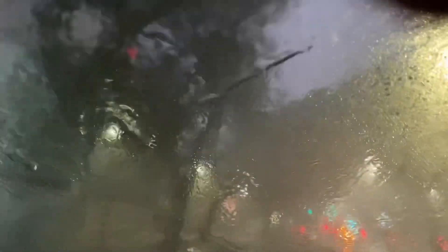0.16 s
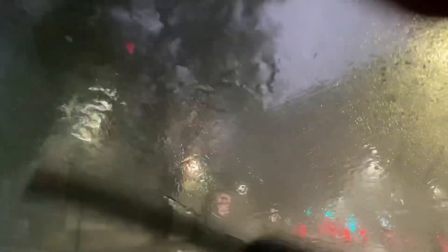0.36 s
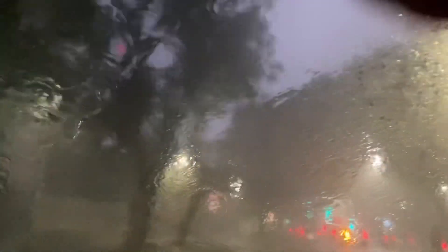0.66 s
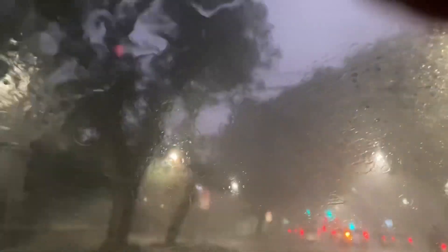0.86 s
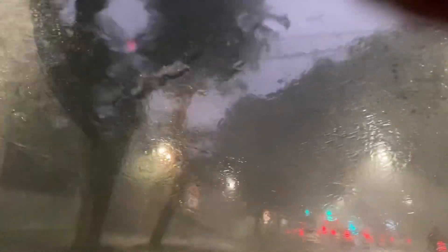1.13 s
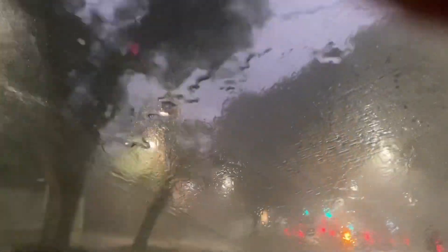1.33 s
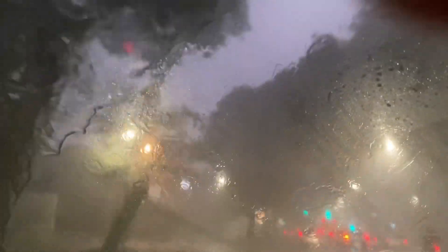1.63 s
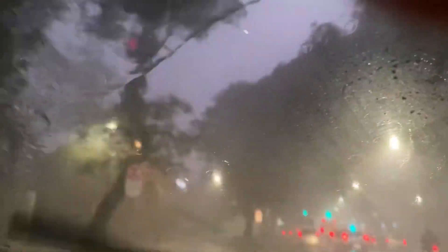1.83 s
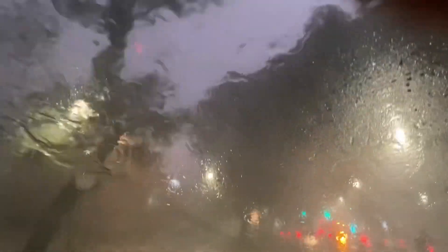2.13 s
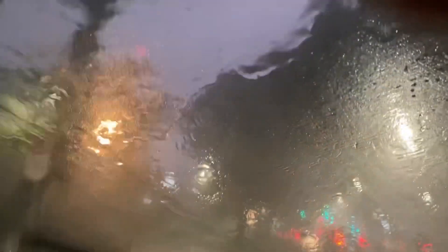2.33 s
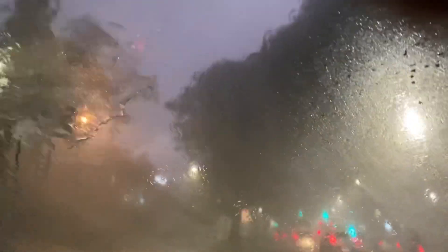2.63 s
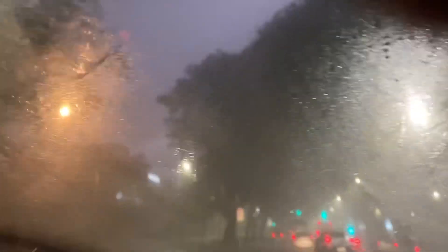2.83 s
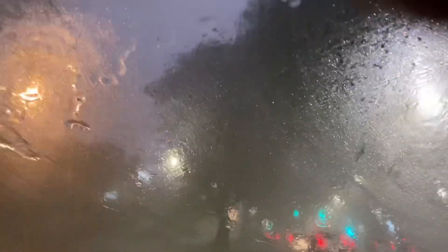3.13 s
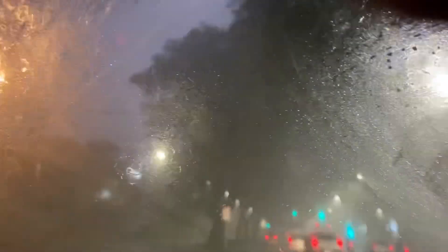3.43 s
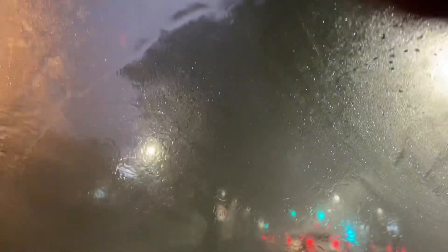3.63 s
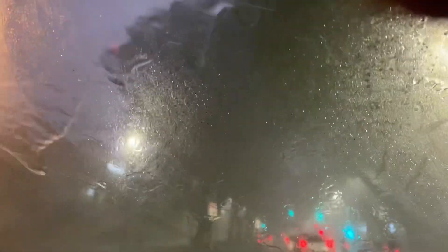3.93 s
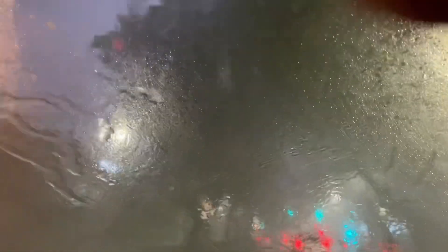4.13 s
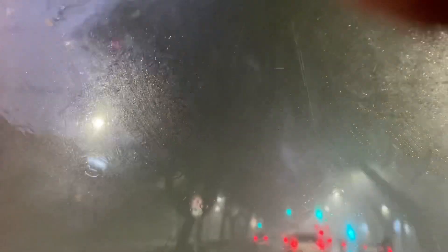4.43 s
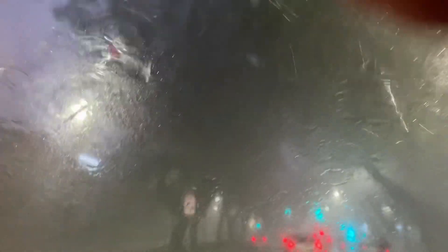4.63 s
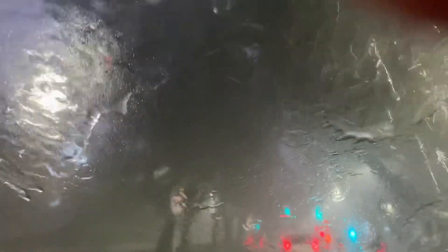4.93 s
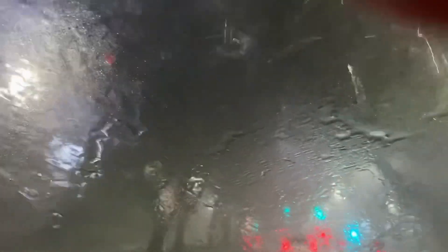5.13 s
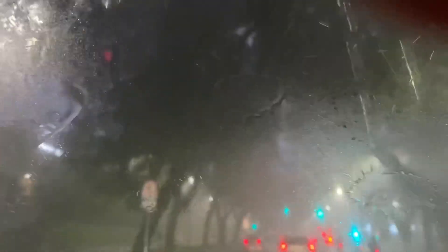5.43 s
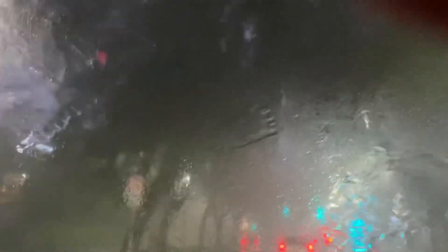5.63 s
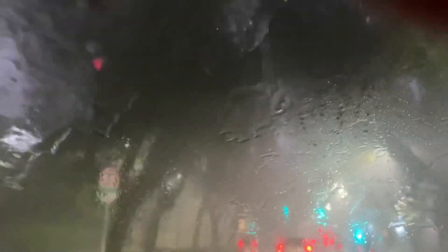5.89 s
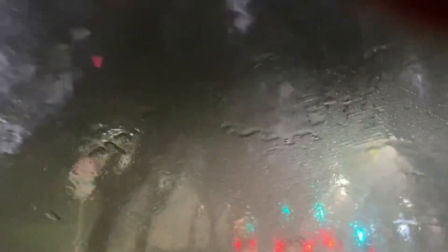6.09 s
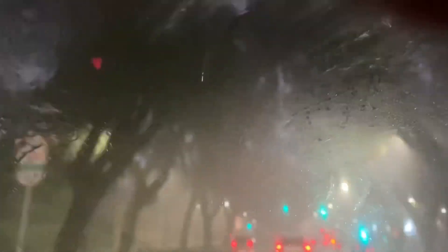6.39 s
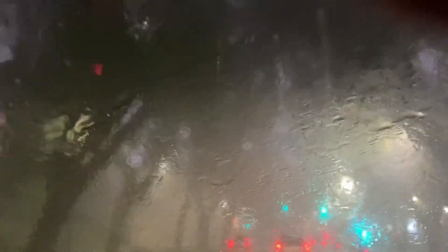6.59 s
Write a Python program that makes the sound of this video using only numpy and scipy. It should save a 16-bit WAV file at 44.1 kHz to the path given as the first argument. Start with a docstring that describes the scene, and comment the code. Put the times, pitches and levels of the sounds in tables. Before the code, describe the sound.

Heavy rain drumming on a car's glass, sharp splats and ticks, regular wiper knocks, and a deep engine hum stepping down over road rumble.

```python
"""Rain drums on the windscreen and roof of a slowing car: hiss and patter are shaped noise, big splats
are noise bursts, and drops on the glass are short ticks. The engine, a stack of multiples of its firing
rate, drones through its gears over a road rumble of lumpy filtered noise. The wipers thud at both ends
of their sweep and heavy drips thud too: decaying cowl modes, with rubber ticks, slaps and low pushes.
In rain, glass and road, left and right share the bass and the top treble and differ most between."""
import sys
import numpy as np
from scipy import signal
from scipy.fft import rfft, irfft, next_fast_len
from scipy.io import wavfile
from scipy.ndimage import uniform_filter1d, map_coordinates

SR = 44100
rng = np.random.default_rng(int(sys.argv[2]) if len(sys.argv) > 2 else 0)


def transcribe(u):
    """Save the signal u as a 16-bit wav file named by the first command-line argument.

    u: samples, shape (n,) or (channels, n), limited to [-1, 1]; the rate is SR.
    q: integer samples, one column per channel.
    """
    v = np.clip(np.atleast_2d(u).T, -1, 1)
    q = np.round(v * 32767).astype(np.int16)
    wavfile.write(sys.argv[1], SR, q)


N = 297802


def amp(db):
    """Decibels to gain."""
    return 10 ** (np.asarray(db) / 20)


def unit(x):
    """Scale to an RMS of 1."""
    return x / np.sqrt(np.mean(x ** 2) + 1e-20)


def along(points, hz):
    """Read (Hz, value) points along a log frequency axis."""
    point_hz, value = np.transpose(points)
    return np.interp(np.log(hz + 1), np.log(point_hz + 1), value)


def curves(rows):
    """One value per sample for each column after the time."""
    s, *columns = np.transpose(rows)
    return [np.interp(np.arange(N) / SR, s, column) for column in columns]


def wobble(rate):
    """A smooth random curve with rate knots a second."""
    knots = rng.standard_normal(int(N * rate / SR) + 4)
    return map_coordinates(knots, [np.arange(N) * rate / SR])


def filtered(x, response):
    """Multiply the spectrum of x by a complex response of frequency."""
    size = next_fast_len(N + 8192)
    return irfft(rfft(x, size) * response(np.fft.rfftfreq(size, 1 / SR)), size)[..., :N]


# Likeness of left and right: pitch_hz, likeness (0 to 1)
LIKENESS = [(30, 1), (70, 1), (160, 0.83), (270, 0.76), (500, 0.17), (800, 0.41), (1100, 0.022),
            (1600, 0.04), (3000, 0.49), (5600, 0.23), (6500, 0.31), (7600, 0.48), (8400, 1), (15500, 1)]
# Phase of left ahead of right: pitch_hz, phase_rad
STEREO_PHASE = [(100, 0), (400, -.3), (900, 1), (1200, -1.5), (1800, -1.4), (2100, .4), (3000, .8),
                (6000, .6), (8400, -np.pi), (9900, -2 * np.pi), (12200, -3 * np.pi), (14000, -4 * np.pi),
                (15600, -5 * np.pi)]
# Balance, left minus right: pitch_hz, balance_db
BALANCE = [(45, 0), (70, -0.7), (120, -1.4), (220, 1), (450, 1.4), (800, 1), (1290, 0.6), (2380, 3),
           (4400, 2.8), (8120, 0.3), (15000, 0)]


def stereo(pair):
    """Two unrelated sounds become left and right: partly shared, with phase and balance turning with pitch."""
    def right_mix(hz):
        alike = np.clip(along(LIKENESS, hz), 0, 1)
        shared = alike * np.exp(-1j * along(STEREO_PHASE, hz))
        own = np.sqrt(1 - alike ** 2)
        return amp(-along(BALANCE, hz) / 2) * np.array([shared, own])

    left = filtered(pair[0], lambda hz: amp(along(BALANCE, hz) / 2))
    right = filtered(pair, right_mix).sum(axis=0)
    return np.array([left, right])


PATCHY_DB = 1.5  # RMS depth of the blotches


def blotchy():
    """Two noises whose gain varies in small patches of time and pitch."""
    spectra = signal.stft(rng.standard_normal((2, N)), nperseg=1024)[2]
    patches = rng.standard_normal(spectra.shape[1:])
    for axis in (0, 1):
        patches = uniform_filter1d(patches, size=3, axis=axis)
    gain = amp(PATCHY_DB * unit(patches))
    return unit(signal.istft(spectra * gain, nperseg=1024)[1][:, :N])


def fading(power, t60):
    """Every spike of power dies away by 60 dB over t60 seconds."""
    return signal.lfilter([1], [1, -amp(-120 / (t60 * SR))], power)


def patter(per_second, spread_db, colour_db, t60):
    """Power of random drops in three colours, mean 1; a few drops are far bigger than the rest."""
    drops = rng.random((round(per_second * 7), 5))
    at = np.minimum(drops[:, 0] * N, N - 1).astype(int)
    size_db = -spread_db * np.log(np.maximum(drops[:, 1], .004))
    power = []
    for chance in drops[:, 2:].T:
        spikes = np.bincount(at, amp(2 * (size_db + colour_db * (2 * chance - 1))), N)
        power.append(fading(spikes, t60))
    power = np.array(power)
    return power / power.mean(axis=1, keepdims=True)


# Loudest single splats: start_s, level_db, tick_pitch_hz, dull_db, bright_db (both relative to level_db)
SPLATS = [(0.045, -21, 2950, 2, -8), (0.0643, -16.5, 3500, 2, -6), (0.096, -20.5, 3940, 0, 4.5),
          (0.1531, -19, 3600, -4, -6), (0.1805, -9, 2790, -7, -3), (0.2, -20, 2500, 4, -7),
          (0.2447, -16.5, 2960, 5.5, -8), (0.2843, -24, 3010, -10, 10), (0.3084, -21, 2200, 5, 1),
          (0.34, -16.5, 3160, 6.5, -9), (0.3802, -16, 3190, -9, -10), (0.415, -23, 4500, -3, 2),
          (0.4219, -16, 4300, -6, 1), (0.43, -19.5, 3500, 5, 0), (0.44, -17, 2000, 2, 0),
          (0.4534, -24, 3200, -4, 2), (0.4756, -21.5, 5500, -10, 7.5), (0.5164, -22.5, 2960, 3, 7.5),
          (0.591, -22.5, 2870, 6, 3), (0.6712, -13.5, 3110, -3, -5), (0.8034, -19, 2740, -1, -6),
          (0.9018, -19.5, 2994, -3, 6.5), (0.932, -15, 2600, -7, -5), (0.957, -23, 3300, -8, 2),
          (1.0002, -28, 3000, -8, 4), (1.009, -21, 2310, 5.5, 8.5), (1.0365, -18, 2410, -9, -7),
          (1.0503, -17, 2628, 1.5, -4), (1.1, -18, 2930, -4, 2), (1.2088, -20.5, 2216, 2, -20),
          (1.304, -28.5, 3370, 13.5, 2), (1.4473, -23.5, 3540, 8.5, -14), (1.5163, -22.5, 3250, 7, -15),
          (1.5777, -23.5, 2880, 6, -8), (1.683, -26, 3403, -8, 6), (1.7253, -31, 3120, 5, -6),
          (1.7519, -17, 3180, -2, -10), (1.7916, -22, 3397, -1, -3), (1.887, -20, 2260, 4, -10),
          (1.898, -19, 2610, 2.5, -5), (1.984, -20.5, 3500, -6, 1), (1.9941, -15, 3820, -5, 3.5),
          (2.04, -10.5, 2895, -1, -4), (2.1089, -18, 3030, -5, -13), (2.156, -20, 3040, 4, -3),
          (2.1882, -21.5, 2945, 5, 4), (2.2544, -18.5, 2966, 2, -9), (2.2955, -23, 2823, -5, 6),
          (2.4017, -20.5, 3180, -10, -15), (2.5233, -25, 2478, 7, -3), (2.505, -24.5, 2500, 7, -9),
          (2.5407, -23, 3000, -6, 2), (2.547, -15, 2512, 0, -1.5), (2.633, -19.5, 2270, 6, -7),
          (2.674, -21, 3137, 2, 3), (2.739, -17, 3790, -7, -4), (2.7786, -23.5, 2990, -8, -2),
          (2.811, -22, 3340, -3, -5), (2.833, -28, 3800, -8, -4), (3.2809, -26, 2493, -9, -5),
          (3.4305, -24, 3000, -3, 1), (3.5113, -25, 3000, -6, 1), (3.9024, -24, 2290, -4, 4),
          (4.175, -25, 2500, 4, 0), (4.2362, -32, 3000, -5, 0), (4.3724, -26.5, 2584, 7, -5),
          (4.8137, -26, 3010, -9, -15), (4.8784, -17.5, 2731, -4, -8), (4.8946, -11.5, 2397, -9, -7),
          (4.9768, -19.5, 2750, 2, 3.5), (4.937, -17.5, 1800, 0, 0), (5.0682, -24, 4500, -6, -4),
          (5.0976, -23, 2600, -4, -10), (5.14, -18.5, 2000, 4.5, -6), (5.1218, -18.5, 2280, 0, -1),
          (5.17, -20, 3400, -8, -3), (5.236, -19, 2450, 5.5, -3), (5.247, -19.5, 2202, -3, -3),
          (5.272, -24, 3413, 9, 5.5), (5.386, -20.5, 2433, 1, 3), (5.4263, -24, 2904, 6, -3),
          (5.471, -23, 2374, 0, -3), (5.5373, -20, 2238, 6, -5), (5.5949, -19, 2327, -1, -13),
          (5.6987, -16, 2200, -19, -25), (5.7367, -39, 2780, -7, -13), (5.803, -15.5, 3376, 1, -9),
          (5.874, -18, 2420, 7.5, 0), (5.923, -20, 2565, -6, -3), (6.0365, -23.5, 3097, 6.5, 0),
          (6.0608, -31.5, 2617, 15, 6), (6.1, -20, 2668, -2, 0), (6.4134, -23, 2686, -11, 0),
          (6.4725, -14.5, 2417, -4, -1), (6.594, -24, 3104, -2, 5), (6.6341, -19, 2270, 2.5, -2),
          (6.6622, -15.5, 3250, -9, -1), (6.6936, -18.5, 4274, -8, 3), (6.7065, -17, 2755, -12, -5),
          (6.726, -15.5, 3450, -13, -5)]
# Decay of a splat's dull, middle and bright splash: t60_s
SPLASH_S = [
    [0.045],
    [0.032],
    [0.024],
]
CRACK_DB, CRACK_S, CRACK_RISE_S = 8, 0.008, 0.0007  # crack over splash before its rise; t60; rise time


def splats():
    """Power of the big drops' crack and splash; the dull part swells slowest and has no crack."""
    power, t = np.zeros((3, N + SR)), np.arange(SR // 8) / SR
    crack = amp(2 * CRACK_DB - 120 * t / CRACK_S) * (1 - np.exp(-t / CRACK_RISE_S)) ** 2
    rise_s = np.array([[.004], [.003], [.002]])
    splash = amp(-120 * t / np.array(SPLASH_S)) * (1 - np.exp(-t / rise_s)) ** 2
    shape = crack * [[0], [1], [1]] + splash
    for s, db, _, dull_db, bright_db in SPLATS:
        colour_db = np.array([[dull_db], [0], [bright_db]])
        power[:, round(s * SR):][:, :len(t)] += amp(2 * (db + colour_db)) * shape
    return power[:, :N]


# Shower: start_s, rain_db, spatter_db (nearer drops relative to the hiss)
SHOWER = [(0, -27.5, -2), (.25, -26, 1), (.45, -27, 2), (.54, -32, 1), (.78, -32, 4.5), (.9, -34, 1),
          (1.22, -33, 2.5), (1.8, -33.5, 2), (2.08, -29.5, -1), (2.42, -33.5, 3), (2.72, -34, 3),
          (2.82, -33, 0), (2.9, -36.5, -0.5), (3.0, -35.5, -7), (3.1, -34.5, 0.5), (3.26, -34.5, -3.5),
          (3.29, -31, -3), (3.6, -29, -3), (3.95, -29.5, -2.5), (4.45, -30.5, -4.5), (4.95, -30.5, 2),
          (5.2, -27.5, -3.5), (5.38, -32.5, 2), (5.85, -30, 2), (6.27, -32, -4), (6.5, -29.5, 2),
          (6.75, -28.5, -4.5)]
# Treble hiss, used as swings around its own mean: start_s, level_db
TREBLE = [(0.0, -39), (0.38, -40), (0.58, -44), (1.35, -46.5), (1.73, -45.5), (2.12, -43.5), (2.59, -47.5),
          (2.84, -48.5), (3.12, -47), (3.55, -43.5), (3.82, -43), (4.36, -44), (4.63, -46), (5.13, -41.5),
          (5.49, -45.5), (6.41, -44), (6.62, -43), (6.75, -37.5)]
# Glass and roof as heard inside, relative weight per Hz: pitch_hz, level_db
PANELS = [(150, -1), (300, 2), (450, -1), (700, -1), (1400, 1), (2400, -3), (3400, -4), (4200, -7.5),
          (5000, -10), (7000, -15.5), (9500, -16), (11500, -21.5), (12800, -39), (15500, -33)]
# Centres of the dull, middle and bright part of every drop: pitch_hz
COLOURS_HZ = [1026, 3110, 8700]
SPLASH_DB = 2.5  # boost of the splats' splash and crack


def rain():
    """Far drops blur to a hiss, nearer ones patter, heavy ones splash; all shake the panels."""
    level_db, spatter_db = curves(SHOWER)
    treble_db, = curves(TREBLE)
    near = .5 * patter(500, spread_db=2.4, colour_db=5, t60=.012)
    near += .3 * patter(90, spread_db=1.2, colour_db=6, t60=.05)
    gusts = amp(2.0 * np.array([wobble(10) for _ in range(3)]))  # each colour swells on its own
    bright_db = level_db.mean() + treble_db - treble_db.mean()
    swell_db = np.array([level_db, level_db, bright_db])
    shower = amp(2 * swell_db) * gusts * (1.09 + amp(2 * spatter_db) * near)
    power = shower + amp(2 * SPLASH_DB) * splats()

    hz = np.fft.rfftfreq(4096, 1 / SR)
    scale = np.sqrt(np.mean(amp(2 * along(PANELS, hz))))
    out = 0
    for k, part in enumerate(power):
        def panel(hz):
            share = along(list(zip(COLOURS_HZ, np.arange(3) == k)), hz)  # the three power shares sum to 1
            return np.sqrt(share) * amp(along(PANELS, hz)) / scale

        out = out + filtered(np.sqrt(part) * blotchy(), panel)
    return stereo(out)


def ticks(s, db, hz, cycles):
    """Drops on glass ring as sines that fall 60 dB within a few cycles, one row per drop."""
    n = np.arange(SR // 200)
    turn = hz[:, None] * n / SR
    grain = amp(db[:, None] - 60 * turn / cycles) * np.sin(2 * np.pi * turn) * (1 - np.exp(-turn / 0.22))
    at = np.round(s * SR).astype(int)[:, None] + n
    return np.bincount(at.ravel(), grain.ravel(), N + SR)[:N]


TICK_DB, CRACKLE_DB = -6, 1  # big ticks relative to splat level; small ticks relative to the spatter
SNAP_HZ, SNAP_DB = 5200, 1.5  # a splat's snap, relative to its bright part


def glass():
    """Drops striking the windscreen tick: big splats and a crackle of small ones following the spatter."""
    s, db, hz, _, bright_db = np.transpose(SPLATS)
    big = ticks(s + 0.00101, db + TICK_DB, hz, cycles=17.0)
    big += ticks(s + 0.00077, db + bright_db + SNAP_DB, np.full(len(s), SNAP_HZ), cycles=2.0)
    level_db, spatter_db = curves(SHOWER)
    pair = []
    for late_s in (0, .0004):  # the pair holds the big ticks slightly apart, and unrelated small ones
        when, size, pitch = rng.random((2600, 3)).T
        when = when * (N - 1) / SR
        bigger_db = -4.2 * np.log(np.maximum(size, .03))
        small_db = (level_db + spatter_db)[(when * SR).astype(int)] + CRACKLE_DB + bigger_db
        small = ticks(when, small_db, 900 * 9 ** pitch, cycles=4.0)
        pair.append(np.roll(big, round(late_s * SR)) + small)
    return stereo(filtered(np.array(pair), lambda f: amp(np.minimum(along(PANELS, f) + 4, 0))))


# Engine: start_s, firing_hz, load_db, step_db (from one multiple of the firing rate to the next)
ENGINE = [(0, 38.9, 9, 2.5), (.2, 38.57, 6, 3), (.55, 38.48, 3, 2), (1, 38.4, 0, 0.3),
          (1.4, 38.58, -2, -0.5), (1.7, 38.4, -1.5, -1.5), (2.14, 37.12, -1.5, 1),
          (2.27, 38.08, -0.5, -1.5), (2.42, 37.45, -0.5, 0), (2.56, 35.62, 2, 2), (2.7, 38.16, 3, 2),
          (2.8, 37.31, 6, 1), (2.93, 30.76, -3.5, -3), (3.1, 29.8, -2, -3), (3.35, 29.8, 3, 0.8),
          (3.6, 28.98, -2, 1.5), (3.9, 26.1, -3, 1.5), (4.3, 24.76, -2.5, -0.5), (5.0, 24.12, -3, 0.2),
          (5.5, 23.78, -2.5, 0.2), (5.98, 23.44, -3, -0.2), (6.25, 33.57, 3.5, -1), (6.45, 30.2, -3, 3),
          (6.75, 30.97, 2, 1.8)]
# How the cabin answers the engine: pitch_hz, level_db
CABIN = [(22, -50), (30, -39.5), (38, -21.5), (48, -40), (75, -32), (96, -22.5), (116, -28.5), (150, -25.5),
         (166, -33.5), (185, -56), (260, -63.5)]


def engine():
    """One pulse per firing: its multiples, in step with each other, boom in the cabin's resonances."""
    firing_hz, load_db, step_db = curves(ENGINE)
    turns = 2 * np.pi * np.cumsum(firing_hz * (1 + 0.0013 * wobble(7.9))) / SR
    hum = 0
    for k in range(1, 9):
        level_db = along(CABIN, k * firing_hz) + load_db + step_db * (k - 3.5) + 0.46 * wobble(9.6)
        hum = hum + amp(level_db) * np.sin(-k * turns)
    return filtered(np.sqrt(2) * hum, lambda f: amp(along(BALANCE, f) / 2 * [[1], [-1]]))


# Road rumble before the band trims: start_s, deep_db, middle_db, upper_db
ROAD = [(0.0, -27, -15.5, -37), (0.49, -19, -17, -34.5), (0.71, -26, -15, -36.5), (1.33, -24, -23, -37),
        (1.77, -33, -22, -34.5), (2.07, -18, -21.5, -34), (2.45, -26, -23, -33), (2.74, -32, -12.5, -33.5),
        (2.95, -25.5, -22, -37), (3.25, -28, -19.5, -39.5), (4.08, -24, -18.5, -34.5),
        (4.17, -25, -23, -37), (4.77, -30.5, -16.5, -39), (5.17, -28.5, -19.5, -37.5),
        (5.71, -23.5, -21.5, -37.5), (6.26, -32, -18, -38.5), (6.75, -25, -17, -36)]
# Colour of the deep, middle and upper rumble, relative weight per Hz: pitch_hz, level_db
RUMBLE = [
    [(22, -40), (34, -1.5), (50, -6), (70, -13), (100, -21)],
    [(40, -56), (60, 1.5), (100, -8.5), (160, -10), (185, -22), (230, -62)],
    [(130, -38), (190, -0.5), (250, -1.5), (330, -5), (440, -7.5), (540, -29.5), (800, -43)],
]
# Trim of the deep, middle and upper rumble: trim_db
RUMBLE_TRIM_DB = [0.5, -3, 1.5]


def road():
    """Tyres and body rumble in lumps: three bands of noise with two random swells each."""
    out = 0
    for level_db, spectrum, trim_db in zip(curves(ROAD), RUMBLE, RUMBLE_TRIM_DB):
        def colour(hz):
            inside = (hz > spectrum[0][0]) * (hz < spectrum[-1][0])
            return amp(along(spectrum, hz)) * inside

        lumps = amp(1.3 * wobble(14) + 1.14 * wobble(4.41)) * rng.standard_normal((2, N))
        out = out + amp(level_db + trim_db) * unit(stereo(filtered(lumps, colour)))
    return out


# Modes of the cowl under the windscreen: pitch_hz, level_db, t60_s, right_gain (left is 1)
COWL = [(93, 3, 0.08, 0.94), (146.4, 10.5, 0.082, 0.83), (155, 8, 0.106, 0.6), (186, -14, 0.4, -2),
        (197, 7, 0.032, 0.42), (254, -11, 0.3, 0.5), (314, -10, 0.25, 0.5), (402, -13, 0.25, 0.8),
        (550, -9, 0.2, -0.3), (730, -25, 0.11, 2.0), (1020, -18, 0.09, 0.24), (1714, -27, 0.025, 2)]


def knock(t, soft_db):
    """One cowl blow: modes swell over a cycle or two, neighbours opposed, tilted -soft_db per octave."""
    blow = 0
    for k, (hz, level_db, t60, right) in enumerate(COWL):
        mode_db = level_db + rng.normal(0, .4) - soft_db * np.log2(hz / 140)
        swell = (1 - np.exp(-t * hz / 0.43)) ** 2
        mode = amp(mode_db - 60 * t / t60) * swell * np.sin(2 * np.pi * hz * t)
        blow = blow + (-1) ** (k + 1) * mode * [[1], [right]]
    return blow


def place(out, s, sound):
    """Add a sound to the mix from s seconds on."""
    out[:, round(s * SR):][:, :sound.shape[-1]] += sound


# Wipers turn at the top: start_s, push_db (before its rise), knock_db (gain on the cowl modes)
TURN = [(0.137, -13, -29), (1.122, -1.5, -22), (2.114, -18, -24), (3.099, -5, -21.5), (4.1, -3.5, -22),
        (5.062, -1.5, -18.5), (6.067, -3, -24)]


def wiper_turns(out, t):
    """At the top of the sweep a light cowl knock leads a soft low push, a decaying 62 Hz sine."""
    for s, push_db, knock_db in TURN:
        place(out, s, amp(knock_db) * knock(t, soft_db=0.0))
        push = amp(push_db - 60 * t / 0.13) * np.sin(2 * np.pi * 62 * t) * (1 - np.exp(-t / 0.0069))
        place(out, s + .011, -push)


# Heavy drips from the trees, before an 11 dB cut: start_s, level_db
DRIPS = [(0.432, -28), (1.888, -30), (4.899, -21), (5.235, -23), (5.869, -22)]


def drips(out, t):
    """Heavy drips from the trees thud on the cowl, its modes tilted towards the treble."""
    for s, db in DRIPS:
        place(out, s - .003, amp(db - 11.0) * knock(t, soft_db=-5.0))


def band(lo_hz, hi_hz, x):
    """Keep a band of x."""
    return signal.lfilter(*signal.butter(2, [lo_hz, hi_hz], "band", fs=SR), x)


# Wipers reach the bottom: start_s, blow_db (gain on the cowl modes), tick_db, slap_db (relative to blow_db)
PARK = [(0.618, -9.5, 6, 5), (1.606, -6.5, 3, 3), (2.5924, -8, 1, 5), (3.583, -6.5, 3, 0),
        (4.562, -8.5, 1.5, 3), (5.553, -8, -1, 2.5), (6.5415, -8, 2, -3.5)]
SECOND_S, SECOND_DB = .0215, -3.8  # the second blade's delay and its level against the first
SETTLE_S, STILL_S = .3, .045  # t60 of the extra damping on the first and second blow


def wiper_parks(out, t):
    """At the bottom the rubber flips with a tick and wet slap of noise, and two blades knock the cowl."""
    for s, db, tick_db, slap_db in PARK:
        fade = amp(-60 * t / .005) + .22 * amp(-60 * t / .09)
        flip = fade * (1 - np.exp(-t / .0003)) * rng.standard_normal(len(t))
        tick = band(1800, 6000, band(2200, 5400, flip)) * [[1], [.6]]
        wet = amp(-60 * t / 0.088) * (1 - np.exp(-t / 0.0054)) ** 2 * rng.standard_normal((2, len(t)))
        slap = band(270, 2600, band(270, 2600, wet))
        place(out, s - .002, amp(db + tick_db) * tick + amp(db + slap_db) * slap)
        settling = amp(-60 * np.maximum(t - SECOND_S, 0) / SETTLE_S)  # starts as the second blade lands
        place(out, s - .0006, amp(db) * knock(t, soft_db=0) * settling)
        stilling = amp(-60 * np.maximum(t - .01, 0) / STILL_S)
        place(out, s + SECOND_S, amp(db + SECOND_DB) * knock(t, soft_db=6) * stilling)


def wipers_and_drips():
    """Everything that strikes the cowl: wiper turns, heavy drips and wiper landings."""
    out, t = np.zeros((2, N + SR)), np.arange(SR // 4) / SR
    wiper_turns(out, t)
    drips(out, t)
    wiper_parks(out, t)
    return out[:, :N]


def scene():
    """Rain and glass ticks over engine and road, with the cowl's thuds."""
    return rain() + glass() + engine() + road() + wipers_and_drips()


FULL, TOP_HZ = .95, 15750  # ceiling of the rounded peaks before the band limit; band limit


def record(dry):
    """Round off the highest peaks, then keep nothing above the band limit."""
    rounded = dry / (1 + np.abs(dry / FULL) ** 8) ** (1 / 8)
    return filtered(rounded, lambda hz: hz < TOP_HZ)


dry = scene()
out = record(dry)
transcribe(out)
```